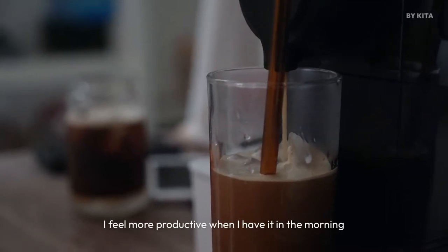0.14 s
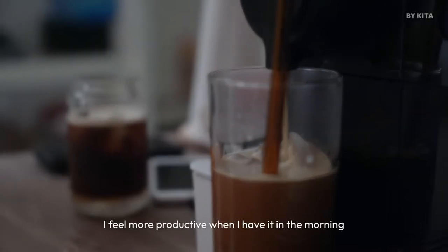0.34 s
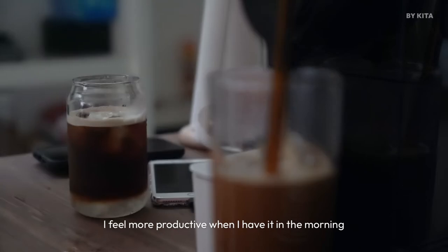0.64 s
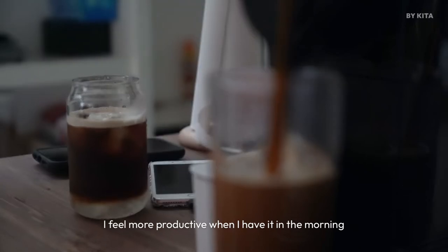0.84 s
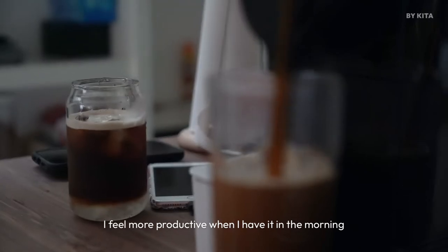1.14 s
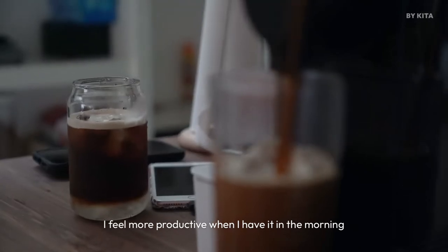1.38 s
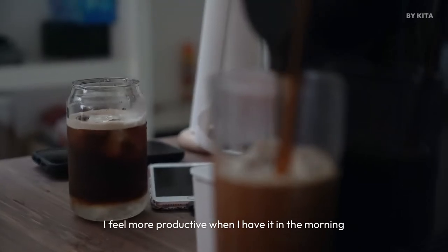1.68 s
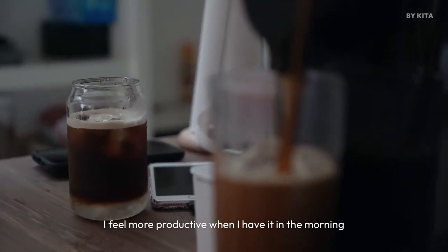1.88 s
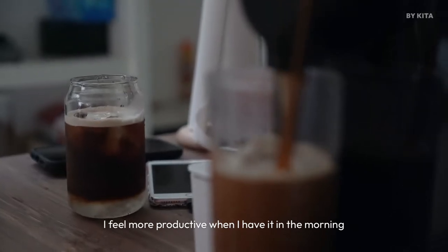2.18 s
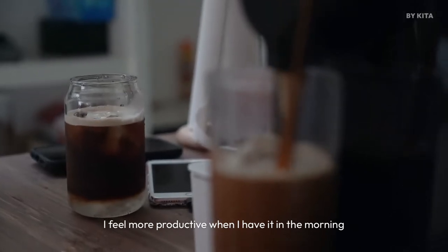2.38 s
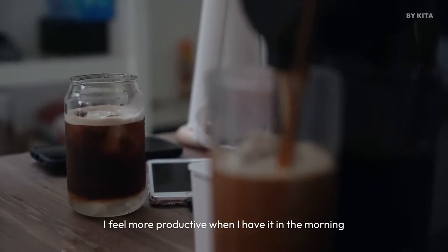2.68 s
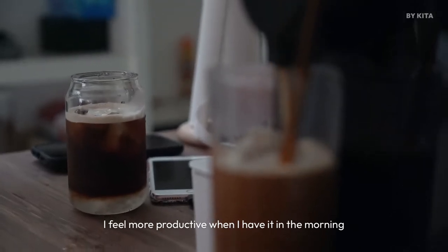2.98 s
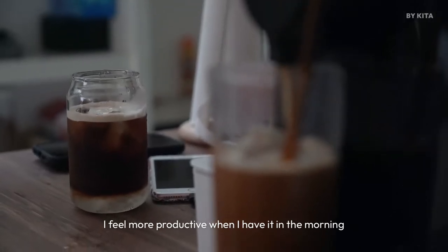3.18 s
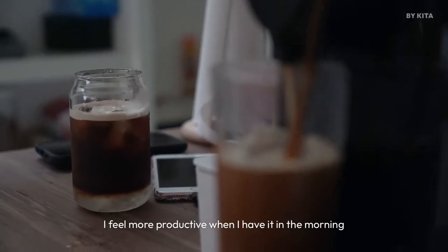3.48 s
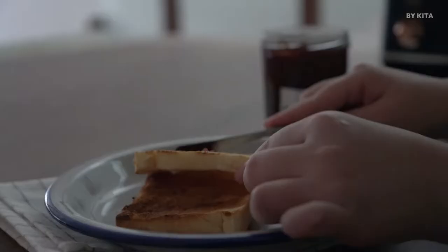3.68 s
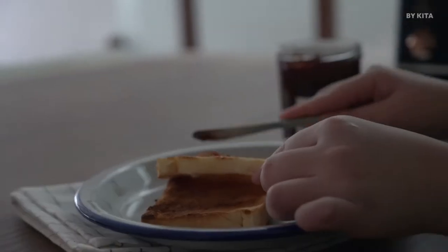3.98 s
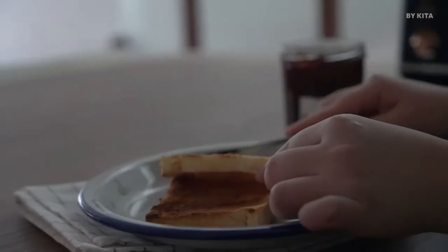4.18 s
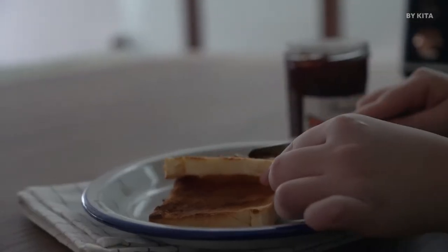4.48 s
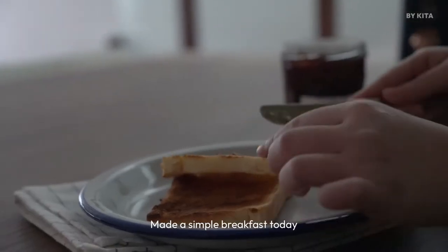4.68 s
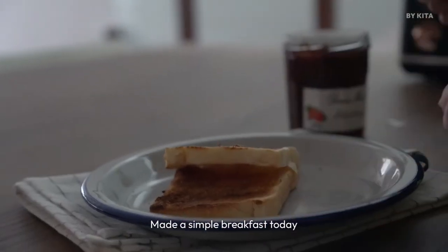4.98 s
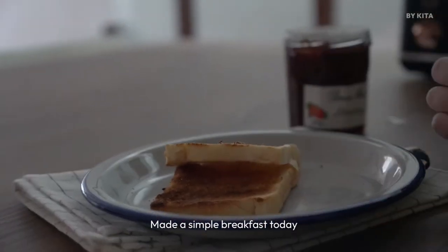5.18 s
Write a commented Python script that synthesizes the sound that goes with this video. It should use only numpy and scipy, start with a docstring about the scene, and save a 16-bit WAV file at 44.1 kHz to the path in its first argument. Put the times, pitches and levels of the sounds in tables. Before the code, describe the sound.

A coffee machine buzzes as it fills a glass and stops, then a knife scrapes toast in a few short strokes.

```python
"""A quiet kitchen. A coffee machine fills a glass: its vibratory pump hums and knocks twice in every
mains cycle, ringing the casing, while the stream hisses and foam pops. The pump stops and a last drop
falls. Then, over the steady rush of a fan, a table knife scrapes across toast in a few short strokes:
the crust breaks in tiny clicks that rasp and ring the blade. A few soft taps fall along the way."""
import sys
import numpy as np
from scipy import signal
from scipy.fft import rfft, irfft, next_fast_len
from scipy.io import wavfile

SR = 44100
rng = np.random.default_rng(int(sys.argv[2]) if len(sys.argv) > 2 else 0)


def waveform_to_disk(signal):
    """Save audio, clipped to [-1, 1], as 16-bit WAV at the path in sys.argv[1]."""
    frames = np.transpose(np.atleast_2d(signal))
    scaled = np.clip(frames, -1, 1) * 32767
    samples = np.round(scaled).astype(np.int16)
    wavfile.write(sys.argv[1], SR, samples)


N = 235714
TIME = np.arange(N) / SR
FFT_SIZE = next_fast_len(N, real=True)
BIN_HZ = np.maximum(np.fft.rfftfreq(FFT_SIZE, 1 / SR), 1)
SIDES = np.array([[1], [-1]])  # left, right
MAINS_HZ = 49.964

# The knife blade's modes. Each row: pitch in Hz, relative level in dB, t60 in seconds.
BLADE_MODES = [(1575, -3, 0.035), (1900, -18, .03), (2014, 0, 0.031), (2210, -9.5, 0.031),
               (3724, -9.5, 0.058), (4350, -14, 0.054), (5850, -29, .04), (7630, -43, 0.066),
               (9440, -17.5, 0.055), (12900, -17, .03), (15100, -12, .03)]


def pump(drive, return_db=3.5):
    """The piston pushes softly on the water and springs back hard on its stop; both ring the casing."""
    # The casing's modes. Each row: pitch in Hz, ring level for a unit click in dB, t60 in seconds.
    casing_modes = [(446.8, -62, 0.27), (602, -49.5, 0.024), (583, -49.5, 0.059), (766.6, -50.5, 0.063),
                    (824, -47.5, 0.024), (906.3, -50, 0.054), (956.6, -51, 0.083), (1090.5, -60.5, 0.13),
                    (1304, -61.5, 0.13), (1430, -60, 0.061), (1565.3, -72, 0.34), (1752, -65.5, 0.093),
                    (2026, -63, 0.058), (2328, -65.5, 0.04), (2510, -65, 0.05), (3140, -62.5, .006),
                    (3695, -64.5, 0.034), (3546, -70, 0.077), (4130, -69.5, 0.032), (6130, -67, 0.022),
                    (6900, -67, 0.025), (8200, -66, 0.022)]
    push = knocks(drive, at_cycle=.9558, uneven_db=.7, jitter_s=.00002)
    rebound = knocks(drive, at_cycle=.6781, uneven_db=1.0, jitter_s=.000012)
    force = lowpass(push, 1077) + from_db(return_db) * lowpass(rebound, 7400)
    return ring_modes(force, casing_modes)


def knocks(drive, at_cycle, uneven_db, jitter_s):
    """One piston blow in every mains cycle, a little uneven in strength and timing."""
    cycles = np.arange(int(TIME[-1] * MAINS_HZ) - 1)
    timing, strength = rng.standard_normal((len(cycles), 2)).T
    times = (cycles + at_cycle) / MAINS_HZ + jitter_s * timing
    at = np.clip(np.round(times * SR).astype(int), 0, N - 1)
    return np.bincount(at, from_db(uneven_db * strength) * drive[at], N)


def hum(drive, delay_s=.022, waver=.073, skew_rad=2.9):
    """The pump's coil shakes the machine on its mounts, and it swings out after the stop."""
    # The hum's partials. Each row: multiple of the mains, rms at full drive in dB, swing-out in seconds.
    partials = [(1, -44, 0.045), (2, -40.5, 0.011), (3, -60.5, 0.0077), (4, -62.5, 0.03), (5, -68, 0.024)]
    phase = 2 * np.pi * (MAINS_HZ * TIME - .385)
    shaking = np.interp(TIME - delay_s, TIME, drive)
    out = 0
    for multiple, db, swing_s in partials:
        decay = np.exp(-1 / (swing_s * SR))
        swing = signal.lfilter([1 - decay], [1, -decay], shaking, zi=[decay])[0]
        level = np.sqrt(2) * from_db(db) * swing * (1 + waver * drift(23))
        out += level * np.cos(round(multiple) * phase + skew_rad)
    return out


def stream(drive, fizz_db=-57, whistle_db=-81, surge=.2, valve_cycle=.61, surge_cycles=.5):
    """Fine fizz and a thin nozzle whistle, surging each time the piston's valve shuts."""
    # Water forced through the nozzle into the foam. Each row: frequency in Hz, relative level in dB.
    fizz_spectrum = [(30, -6), (85, 6), (130, -15), (200, -10.5), (330, -22), (470, -15), (570, -10.5),
                     (870, -3.5), (2000, -11.5), (3000, -14.5), (3650, -15), (4400, -18.5), (6600, -16.5),
                     (8400, -18.5), (9500, -23), (15500, -29.5)]
    # A brief high ring from the knock at 1.12 s; later the nozzle whistle swells in the same band.
    # Each row: middle in seconds, half length in seconds, rise in dB.
    ring_and_swell = [(1.12, .025, 16), (2.82, .35, 10.5)]
    since_valve = (MAINS_HZ * TIME - valve_cycle) % 1
    pulsing = 1 + surge * np.exp(-since_valve / surge_cycles)
    fizz = spread(grains(per_s=16000, size_db=2.5) * pulsing, fizz_spectrum)
    high_band = band(rng.standard_normal((2, N)) * pulsing, hz=5610, width_hz=100)
    rise_db = sum(db * np.exp(-((TIME - middle) / half) ** 2) for middle, half, db in ring_and_swell)
    return drive * (from_db(fizz_db) * fizz + from_db(whistle_db + rise_db) * high_band)


def coffee_machine(drive):
    """Pump and stream ring out in the kitchen, mids leaning right and highs leaning left."""
    # The machine's stereo position. Each row: frequency in Hz, left over right in dB.
    position = [(200, 0), (400, -1.8), (1300, -2.3), (2400, -3.3), (4400, -.5), (8000, 6), (15000, 6.5)]
    machine = in_kitchen(pump(drive) + stream(drive), room_db=-12, t60=.55, wall_hz=7000)
    return shape(machine, pan(on_bins(position)))


def scrapes(width=.51, release_t60=.14, blade_main_hz=1960, loss_db_per_octave=10):
    """Under each stroke the crust breaks in dense tiny clicks that rasp and ring the blade."""
    # Knife strokes. Each row: start, attack and time until release in seconds,
    # relative rasp and bite levels in dB, pitch of the edge's bite in Hz.
    strokes = [(3.641, .003, .13, -81, -66, 3280), (3.731, 0.004, 0.029, -41.5, -54, 3930),
               (4.078, 0.027, 0.035, -50.5, -47.5, 2000), (4.36, 0.033, 0.054, -54, -54, 1920),
               (4.4355, .0022, 0.052, -46, -51, 2010)]
    # The crust's rasp. Each row: frequency in Hz, relative level in dB.
    rasp_spectrum = [(700, -45), (1400, -15), (1950, 3.5), (3000, -1), (4300, -0.5), (6500, -4),
                     (7400, -8.5), (8000, -1.5), (8600, -13), (11000, -11), (13000, -7), (15500, -13.5)]
    mid, side = grains(per_s=4500, size_db=3)
    crumbs = mid + width * SIDES * side
    rasp = unit_rms(shape(crumbs, from_db(on_bins(rasp_spectrum))))
    blade = unit_rms(ring_modes(crumbs, BLADE_MODES))
    out = np.zeros((2, N))
    for start, attack, length, rasp_db, bite_db, bite_hz in strokes:
        release = from_db(-60 * np.maximum(TIME - start - length, 0) / release_t60)
        pressure = np.clip((TIME - start) / attack, 0, 1) * release
        bite = band(crumbs[:, ::-1], bite_hz, width_hz=900)
        # The blade rings most when the edge bites near its main mode.
        blade_db = bite_db + .5 - loss_db_per_octave * abs(np.log2(bite_hz / blade_main_hz))
        out += pressure * (from_db(rasp_db) * rasp + from_db(blade_db) * blade + from_db(bite_db) * bite)
    return out


def crust_snaps(blade_db=-3, crack_db=5):
    """Larger breaks in the crust: each is a sharp crack with a damped ring of the blade."""
    # Snaps under the blade. Each row: time in seconds, relative strength in dB.
    snaps = [(3.7347, -42), (4.1065, -37), (4.1152, -34.5), (4.4392, -45), (4.4503, -37), (4.4565, -38),
             (4.4753, -37.5)]
    clicks = np.zeros(N)
    for start, db in snaps:
        clicks[round(start * SR)] = from_db(db)
    blade = ring_modes(clicks, BLADE_MODES, t60_scale=.27)
    crack = ring(clicks, hz=2180, t60=.0071)
    return from_db(blade_db) * blade + from_db(crack_db) * crack


def knife():
    """A knife scrapes and snaps the toast; so small a source radiates no bass."""
    toast = highpass(pan(1) * scrapes() + crust_snaps(), 1450)
    return in_kitchen(toast, room_db=-12, t60=.29, wall_hz=6100)


def pops(width_share=.42, t60_cycles=48):
    """Sharp little pops of foam, drops and a crumb: the higher, the wider in band and the shorter."""
    # The pops. Each row: start in seconds, level in dB, centre in Hz, left over right in dB.
    events = [(1.6374, -36.5, 6340, 10), (2.3298, -49, 6000, 9), (2.9864, -53, 13000, 8),
              (3.3706, -56, 6000, 16), (3.887, -41, 13000, 3)]
    dry = sum(pan(side_db) * burst(start, db, hz, width_share * hz, t60_cycles / hz)
              for start, db, hz, side_db in events)
    return in_kitchen(dry, room_db=-15)


def last_drop(start=3.4482):
    """A bright splash, then the tiny bubble that it traps rings on."""
    splash = burst(start, db=-43, hz=9800, width_hz=5500, t60=.012)
    bubble = burst(start + .006, db=-56.5, hz=8800, width_hz=1200, t60=.1)
    return in_kitchen(pan(6.5) * splash + pan(12) * bubble, room_db=-6.5)


def taps(width_share=.82):
    """Soft taps on machine, table and plate, and one dull bump on the table, all straight ahead."""
    # The taps. Each row: start in seconds, level in dB, centre in Hz, t60 in seconds.
    events = [(1.1159, -47, 2570, 0.023), (3.563, -60, 2370, 0.13), (5.046, -63.5, 5600, .02),
              (5.1851, -61.5, 5000, .05)]
    dry = sum(burst(start, db, hz, width_share * hz, t60) for start, db, hz, t60 in events)
    tapping = in_kitchen(pan(0) * dry, room_db=-6)
    bump = burst(start=3.568, db=-58, hz=257, width_hz=110, t60=.3)
    return tapping + bump


def still_air(level_db=-58.5, cut_s=3.634):
    """The quiet room tone; its level dips at the cut from the coffee scene to the toast scene."""
    # The room tone. Each row: frequency in Hz, relative level in dB.
    spectrum = [(25, 5.5), (80, 5), (200, -3.5), (320, -12), (430, -18.5), (700, -4.5), (1500, -11),
                (3000, -24.5), (6000, -25), (15500, -30.5)]
    fade = np.clip((cut_s - TIME) / .012, .15, 1)
    return from_db(level_db) * fade * spread(rng.standard_normal((2, N)), spectrum)


def fan(heard_from_s=3.642, fade_in_s=.056, rush_db=-53, tone_hz=706, tone_db=-66):
    """After the cut to the toast scene, a fan's steady rush and faint wavering tone are heard."""
    # The rush of air. Each row: frequency in Hz, relative level in dB.
    spectrum = [(25, 2.5), (55, 3), (78, 9.5), (140, 5.5), (210, -3.5), (300, -8), (450, -13.5), (590, 1.5),
                (800, 1), (1100, -3), (2000, -11.5), (3500, -18.5), (5000, -26.5), (9000, -30),
                (15500, -31)]
    rush = spread(rng.standard_normal((2, N)), spectrum)
    phase = 2 * np.pi * tone_hz * TIME
    tone = drift(2.2) * np.cos(phase) + drift(4.3) * np.sin(phase)
    since_cut = np.maximum(TIME - heard_from_s, 0)
    fade = (since_cut > 0) * (1 - .45 * np.exp(-since_cut / fade_in_s))
    return fade * (from_db(rush_db) * rush + from_db(tone_db) * tone)


def in_kitchen(x, room_db, t60=.2, wall_hz=12100):
    """A sound plus its diffuse reflections off worktop and walls, above the bass, different at each ear."""
    t = TIME[:SR // 2]
    noise = highpass(lowpass(rng.standard_normal((2, len(t))), wall_hz), 550)
    tail = noise * from_db(-60 * t / t60) * (t > .003)
    tail /= np.sqrt(np.sum(tail ** 2) / 2)
    return x + from_db(room_db) * signal.fftconvolve(x, tail, axes=1)[:, :N]


def spread(pair, spectrum, mono_below_hz=400):
    """Two unrelated signals become a coloured stereo field; long waves reach both ears alike; rms 1."""
    # Likeness of the two ears. Each row: frequency in Hz, correlation from 0 to 1.
    likeness = [(350, .98), (700, .88), (1400, .72), (3000, .55), (7000, .15), (15000, .12)]
    alike, gain = np.clip(on_bins(likeness), 0, 1), from_db(on_bins(spectrum))
    mid = shape(pair[0], gain * np.sqrt(1 + alike))
    side = highpass(shape(pair[1], gain * np.sqrt(1 - alike)), mono_below_hz)
    return unit_rms(mid + SIDES * side)


def grains(per_s, size_db):
    """Two trains of random clicks of uneven size; rms 1."""
    sizes = from_db(size_db * np.minimum(rng.exponential(1, (2, N)), 4))
    signs = rng.choice([-1, 1], (2, N))
    return unit_rms(sizes * signs * (rng.random((2, N)) < per_s / SR))


def burst(start, db, hz, width_hz, t60, skirt_db=-14):
    """A quickly dying burst of noise in one resonance with wide skirts."""
    t = TIME[:SR // 4]
    noise = rng.standard_normal(len(t))
    tone = band(noise, hz, width_hz) + from_db(skirt_db) * band(noise, hz, 1.95 * hz)
    return np.pad(tone * from_db(db - 60 * t / t60), (round(start * SR), N))[:N]


def ring_modes(force, modes, t60_scale=1):
    """A force rings all of a body's modes, in alternating polarity."""
    return sum((-1) ** k * from_db(db) * ring(force, hz, t60 * t60_scale)
               for k, (hz, db, t60) in enumerate(modes))


def ring(force, hz, t60):
    """One mode: a unit click starts a dying sine of height 1."""
    decay, step = from_db(-60 / (t60 * SR)), 2 * np.pi * hz / SR
    return signal.lfilter([0, np.sin(step)], [1, -2 * decay * np.cos(step), decay ** 2], force + 1e-18)


def drift(rate_hz):
    """A slow random wander; rms 1."""
    return unit_rms(shape(rng.standard_normal(N), 1 / (1 + (BIN_HZ / rate_hz) ** 4)))


def band(x, hz, width_hz):
    """One band-pass resonance; rms 1."""
    edges = np.hypot(hz, width_hz / 2) + np.array([-1, 1]) * width_hz / 2
    sos = signal.butter(2, np.clip(edges, 50, .45 * SR), "band", fs=SR, output="sos")
    return unit_rms(signal.sosfilt(sos, x))


def lowpass(x, hz):
    """Soften the top."""
    return signal.sosfilt(signal.butter(2, hz, fs=SR, output="sos"), x)


def highpass(x, hz):
    """Cut the lows steeply."""
    return signal.sosfilt(signal.butter(4, hz, "high", fs=SR, output="sos"), x)


def shape(x, gain):
    """Equalise with a gain for each frequency bin."""
    return irfft(rfft(x, FFT_SIZE) * gain, FFT_SIZE)[..., :N]


def on_bins(points):
    """A curve through the points, on a log frequency axis."""
    hz, value = np.transpose(points)
    return np.interp(np.log(BIN_HZ), np.log(hz), value)


def pan(db):
    """Stereo gains with the left louder by db."""
    return from_db(SIDES * db / 2)


def from_db(db):
    """Decibels to gain."""
    return 10 ** (np.asarray(db) / 20)


def unit_rms(x):
    """Scale to rms 1."""
    return x / np.sqrt(np.mean(x ** 2) + 1e-20)


def scene(pump_drive=.84, stop_s=3.25, run_down_s=.032):
    """The pump runs at a steady drive (1 is full) and runs down; the drop and the toast scene follow."""
    drive = pump_drive * np.clip((stop_s - TIME) / run_down_s, 0, 1)
    return coffee_machine(drive) + hum(drive) + pops() + taps() + last_drop() + knife() + still_air() + fan()


def record(dry, spacing_hz=60, notch_width_hz=24, notch_db=-17, cutoff_hz=15800):
    """A hum filter cuts eight evenly spaced notches into the bass; the top is cut steeply."""
    for hz in spacing_hz * np.arange(1, 9):
        notched = signal.lfilter(*signal.iirnotch(hz, hz / notch_width_hz, fs=SR), dry)
        dry = notched + from_db(notch_db) * (dry - notched)
    return signal.sosfilt(signal.ellip(12, .1, 70, cutoff_hz, fs=SR, output="sos"), dry)


dry = scene()
out = record(dry)
waveform_to_disk(out)
```